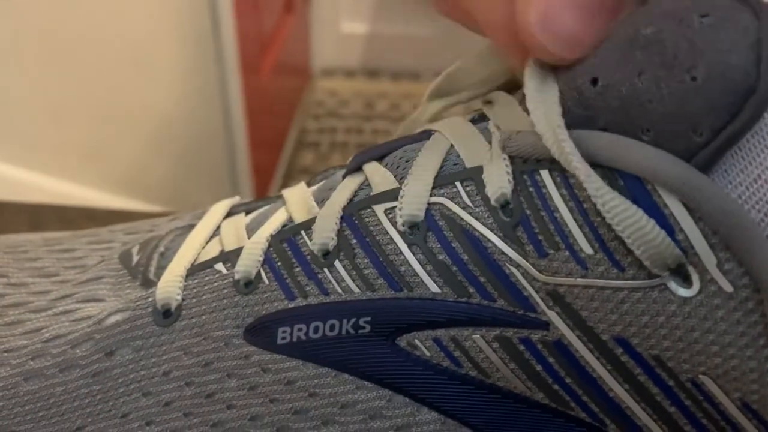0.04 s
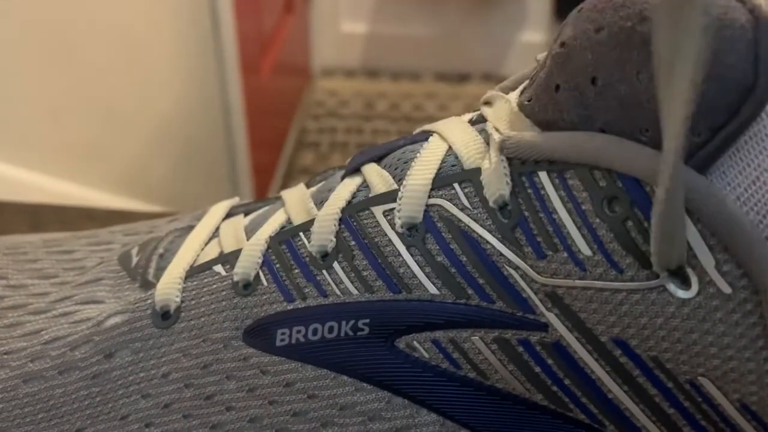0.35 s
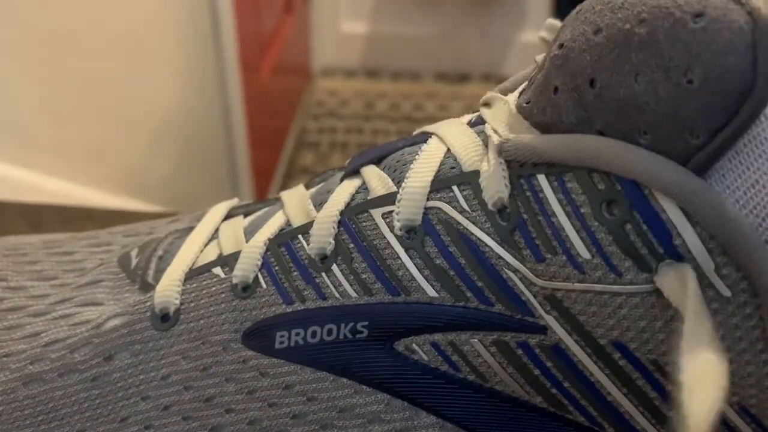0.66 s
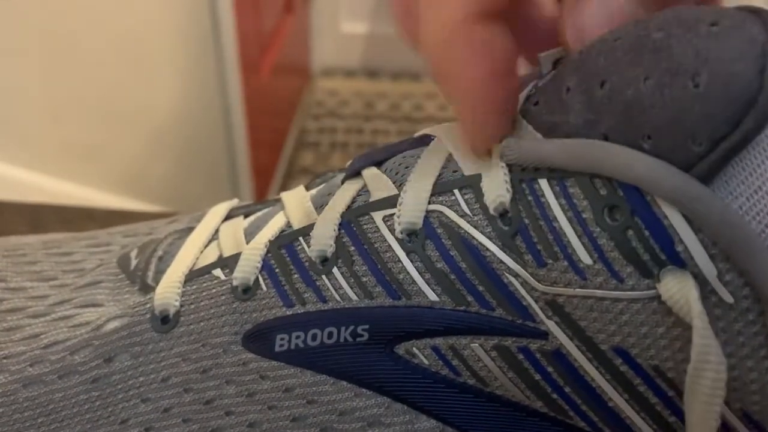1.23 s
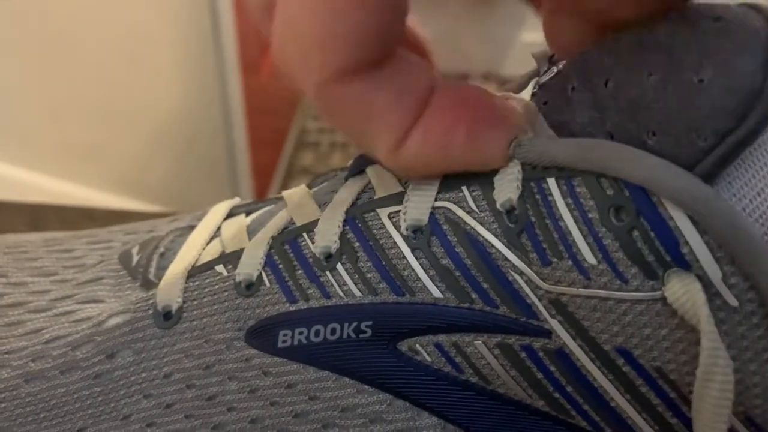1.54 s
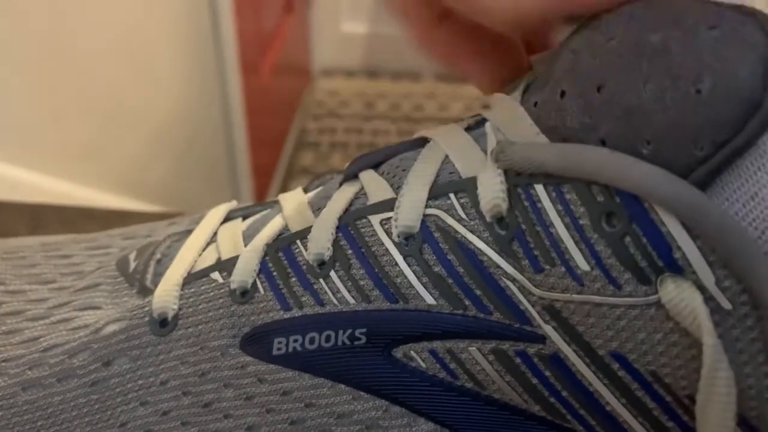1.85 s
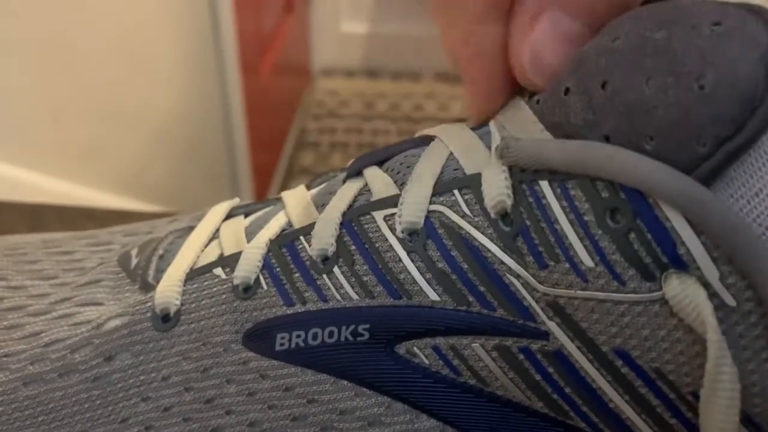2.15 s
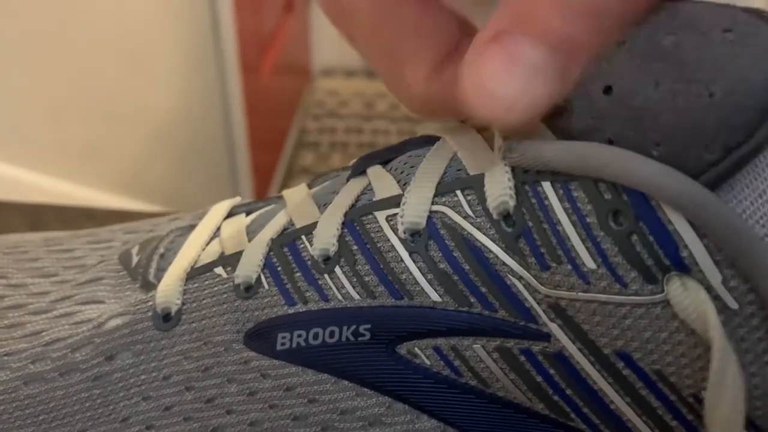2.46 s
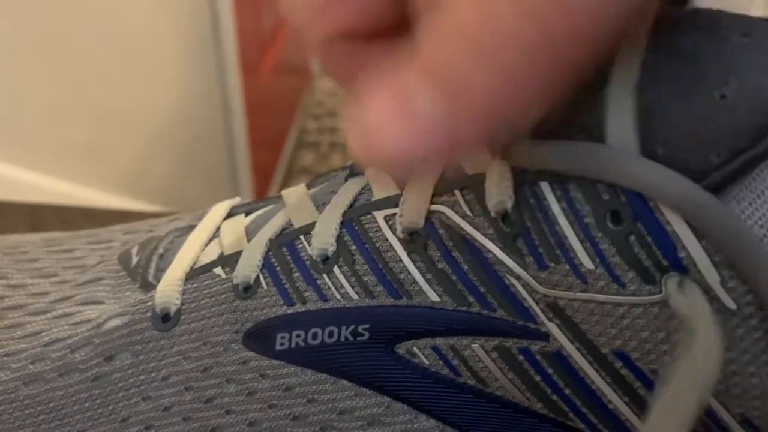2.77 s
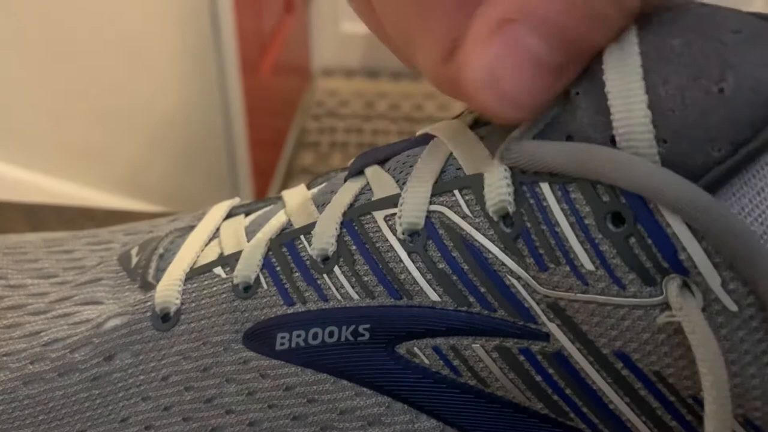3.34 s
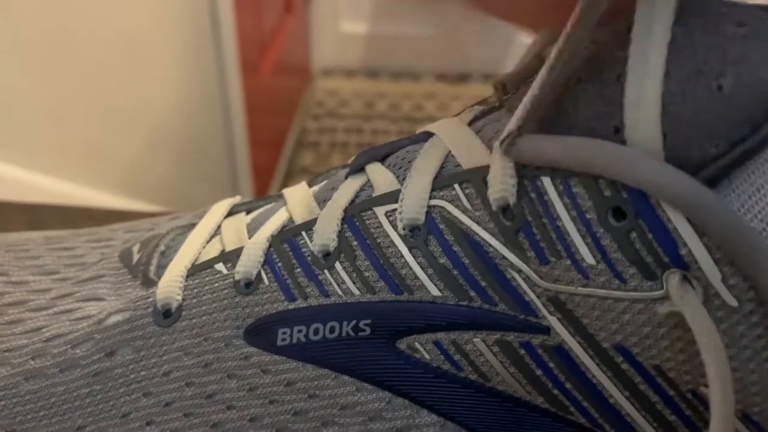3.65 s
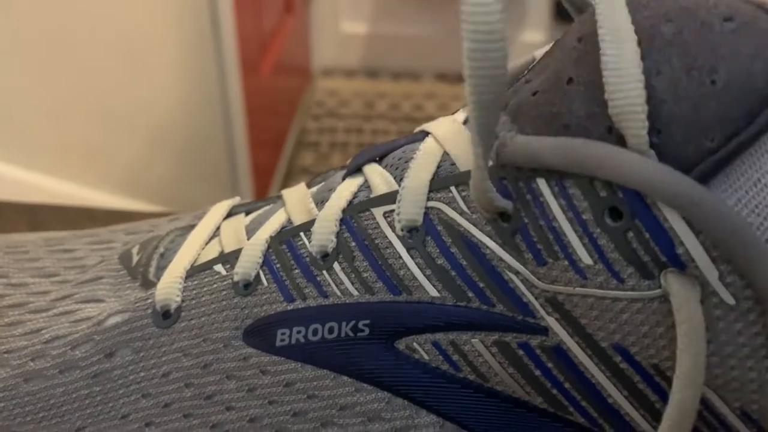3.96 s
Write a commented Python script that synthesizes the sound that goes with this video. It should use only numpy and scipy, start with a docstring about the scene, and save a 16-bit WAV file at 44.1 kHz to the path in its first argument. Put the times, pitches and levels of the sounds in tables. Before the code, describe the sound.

Shoelace being pulled loose close up, rasping in short bursts with light snaps and taps.

```python
"""A shoelace is untied close to a pair of microphones, in a quiet room with a low rumble.
Stick-slip friction makes the braid hiss and scrape as it is drawn through the knot and eyelets.
Now and then it slips or is flicked: dispersion turns the jolt into a falling chirp,
the fibres rasp, and the padded shoe thumps in its damped modes."""
import sys
import numpy as np
from scipy import signal
from scipy.fft import rfft, irfft
from scipy.io import wavfile

SR = 44100
rng = np.random.default_rng(int(sys.argv[2]) if len(sys.argv) > 2 else 0)


def wav_out(sig):
    """Save sig, one row per channel (or a flat mono array), as 16-bit PCM at SR to the path in sys.argv[1]."""
    wavfile.write(sys.argv[1], SR, np.round(np.clip(np.atleast_2d(sig).T, -1, 1) * 32767).astype(np.int16))


N = 176400
FREQS = np.arange(N // 2 + 1) * SR / N


def from_db(db):
    """Amplitude ratio: tenfold for every 20 dB."""
    return 10 ** (np.asarray(db) / 20)


def unit_rms(x):
    """Normalisation to a mean power of 1."""
    return x / np.sqrt(np.mean(x ** 2) + 1e-20)


def gains(points):
    """Frequency response through (Hz, dB) points, interpolated over log frequency."""
    hz, db = np.transpose(points)
    return from_db(np.interp(np.log(FREQS + 1e-9), np.log(hz), db))


def colour(x, points):
    """Linear filtering: the spectrum is multiplied by a frequency response."""
    return irfft(rfft(x) * gains(points), N)


def stereo(pair, side_points):
    """Mid-side mixing: two uncorrelated signals share a constant total power."""
    ratio = gains(side_points)
    weights = np.array([np.ones_like(ratio), ratio]) / np.sqrt(1 + ratio ** 2)
    mid, side = irfft(rfft(pair) * weights, N)
    return np.array([mid + side, mid - side])


def drift(rate_hz):
    """Random modulation: low-passed noise with a spread of 1."""
    count = N // 20 + 1
    rolloff = (1 + (FREQS[:count // 2 + 1] / rate_hz / 2) ** 2) ** 2
    slow = irfft(rfft(rng.standard_normal(count)) / rolloff, count)
    return np.interp(np.arange(N) / 20, np.arange(count), unit_rms(slow))


def add(out, start_s, sound):
    """Superposition: a short sound adds to what is already there."""
    i = max(0, int(start_s * SR))
    out[i:i + len(sound)] += sound[:max(0, N - i)]


# Spectrum of the rumble. Each row: frequency in Hz, relative spectral density in dB.
RUMBLE_SPECTRUM = [(22, -8), (40, -5.5), (62, 0), (82, -2), (115, 1.5), (150, -6), (200, -10), (260, -17.5),
                   (400, -22), (520, -26.5), (650, -40), (950, -49), (2500, -69), (6000, -51), (10000, -79),
                   (16000, -51)]
# Resonances in the rumble. Each row: centre in Hz, bandwidth in Hz, level in dB.
DRONE_BANDS = [(95, 12, -60.5), (288.1, 18.3, -64.5), (454, 39, -71.5)]
# Stereo width of the rumble. Each row: frequency in Hz, side minus mid in dB.
RUMBLE_WIDTH = [(60, -19.5), (130, -16), (280, -5), (600, -2.5), (2000, 0), (16000, 5)]

def room_rumble():
    """Low broadband noise, as of ventilation, drones where narrow resonances reinforce it."""
    rumble = from_db(-51) * unit_rms(colour(rng.standard_normal((2, N)), RUMBLE_SPECTRUM))
    for hz, width_hz, db in DRONE_BANDS:
        band = rfft(rng.standard_normal((2, N))) / (1 + ((FREQS - hz) / width_hz * 2) ** 2)
        rumble += from_db(db) * unit_rms(irfft(band, N))
    return stereo(rumble, RUMBLE_WIDTH)


# Spectrum of the wall reflections. Each row: frequency in Hz, relative gain in dB.
REVERB_SPECTRUM = [(100, 4), (500, 23.5), (2000, -8.5), (6000, -57), (15000, -24)]

def reverberation(x, level_db=-29, t60_s=.18):
    """Diffuse reflections from the walls form a faint, dull tail that decays exponentially."""
    t = np.arange(SR // 2) / SR
    tail = colour(rng.standard_normal((2, N)), REVERB_SPECTRUM)[:, :len(t)] * from_db(-60 * t / t60_s)
    tail /= np.sqrt(np.sum(tail ** 2) / 2)
    return from_db(level_db) * signal.fftconvolve(x, tail, axes=1)[:, :N]


def shoe_reflection(x, delay_s=0.001079, level_db=-17, wander=0.0074):
    """Comb filtering: the shoe returns an inverted echo whose delay wanders as the lace moves."""
    now = np.arange(N)
    delayed = now - SR * delay_s * (1 + wander * drift(rate_hz=2.6))
    return x - from_db(level_db) * np.array([np.interp(delayed, now, channel) for channel in x])


# Stereo width of the lace. Each row: frequency in Hz, side minus mid in dB.
LACE_WIDTH = [(100, -20.5), (400, -14.5), (1100, -1), (2000, 5.5), (3200, 8), (4200, -4.5), (5100, 6.5),
              (6200, -14.5), (7200, -0.5), (8500, 23.5), (9700, -2), (11000, -7.5), (12300, -5),
              (13300, 74), (14600, -29), (15600, -29)]

def at_microphones(pair):
    """Phase difference: the microphones hear some bands of the lace in phase, others in opposition."""
    return stereo(pair, LACE_WIDTH)


def lean_left(x, difference_db=3.5):
    """Level difference: the lower-pitched friction is nearer the left microphone, so louder there."""
    return x * from_db(difference_db / 2 * np.array([[1], [-1]]))


def chirp(t, hz, rise_s, halving_s):
    """Dispersion: a jolt runs along the lace highs first, so the pitch falls."""
    age = t / rise_s
    tail = .025 * np.exp(-age / 10)
    envelope = (age * np.exp(1 - age) + tail) * np.tanh(2 * age) ** 2
    return -envelope * np.sin(2 * np.pi * hz * halving_s * np.log1p(t / halving_s))


# Modes of the shoe. Each row: frequency in Hz, relative level in dB, time to fall 60 dB in seconds.
SHOE_MODES = [(64.3, -1, 0.21), (88.8, 10, 0.088), (188.7, 4, 0.058), (236, 5.5, 0.0416),
              (416.3, -3, 0.079)]

def shoe_thump(t, rise_s=0.0086):
    """Damped modes ring in the shoe, building slowly as the padding gives way."""
    ring = sum(from_db(db - 60 * t / t60) * np.sin(2 * np.pi * hz * t) for hz, db, t60 in SHOE_MODES)
    return ring * (1 - np.exp(-t / rise_s))


# Spectra of the mid and treble rasp. Each row: frequency in Hz, relative spectral density in dB.
MID_RASP_SPECTRUM = [(400, -19), (1200, 5.5), (2100, 6), (3200, 2), (4200, -3), (5500, -10), (9000, -18)]
TREBLE_RASP_SPECTRUM = [(2500, -2), (5500, -12), (7500, 4), (10500, 2.5), (13000, -13.5), (16000, -0.5)]

def fibre_rasp(starts_s, levels_db, spectrum, rise_s=.0008, decay_s=.0016):
    """Transient friction: fibres tear past one another in noise bursts a few milliseconds long."""
    lead_s = .01
    t = np.arange(SR // 20) / SR - lead_s
    burst = np.exp(np.minimum(t / rise_s, -t / decay_s))
    envelope = np.zeros(N)
    for start_s, db in zip(starts_s, levels_db):
        add(envelope, start_s + rise_s - lead_s, from_db(db) * burst)
    noise = colour(rng.standard_normal((2, N)), spectrum)
    return unit_rms(at_microphones(noise)) * envelope


# Slips and flicks. Each row: start in seconds, chirp level in dB, starting pitch in Hz, rise in ms,
# time to half the pitch in ms, mid rasp level in dB, treble rasp level in dB, thump level in dB.
SLIPS = [ (0.067, -42, 2500, 2.1, 20, -45.5, -47, -56), (0.0938, -41, 1520, 1.44, 10.6, -41, -44, -41),
         (0.103, -43, 955, 1, 7.9, -45.5, -53, -48), (0.643, -28, 1750, 1.1, 0.74, -68, -88, -38),
         (0.722, -54.5, 5060, 1.3, 22, -47.5, -57, -60), (0.7351, -34.5, 1890, 1.17, 10.6, -52, -56, -42),
         (0.7373, -34, 540, 1.8, 20, -42.5, -73, -38), (0.742, -33.5, 2280, 0.97, 7.8, -46, -67, -35),
         (0.745, -42.5, 970, 0.69, 8, -55, -48, -40.5), (0.7733, -55, 1770, 2.3, 4, -60, -62, -67),
         (0.797, -46, 890, 1.3, 9.8, -45, -75, -43.5), (0.857, -39, 3690, 0.93, 13, -42.5, -34, -42.5),
         (1.354, -53, 1490, 1.3, 2.4, -68, -53, -49.5),
         (1.3868, -40.5, 2470, 1.87, 1.99, -35, -46.5, -39.5),
         (1.447, -75, 2510, 0.55, 3.8, -56, -53.5, -44), (1.5955, -51, 1590, 1.5, 4, -44, -39, -45),
         (1.602, -42.5, 1630, 1.1, 6.3, -44, -46, -55), (1.632, -28, 1877, 1.83, 2.84, -31, -31.5, -71),
         (1.636, -38, 350, 1.3, 10, -30, -28.5, -28.5), (1.8138, -57, 2430, 1.6, 2.1, -61, -46, -67),
         (2.2347, -81, 2000, 0.87, 3, -70, -59, -59), (2.556, -52, 1240, 2.2, 4, -61, -43, -57),
         (2.576, -42, 845, 3.1, 6.2, -61, -37.5, -66), (2.591, -35.5, 870, 1.94, 4.8, -40, -47, -64),
         (2.6, -44, 860, 1.9, 4.8, -43, -43, -69), (2.610, -32.5, 900, 0.84, 2.9, -44.5, -44, -69),
         (2.6751, -27, 1100, 1.52, 2.5, -58, -48, -61), (2.702, -32, 1720, 0.71, 1.6, -57, -30.5, -65),
         (2.705, -28.5, 373, 2.24, 5.9, -59, -37, -48), (2.8605, -35.5, 1210, 1.7, 2.43, -52.5, -49, -43.5),
         (2.9243, -79, 2000, .8, 4.1, -68, -55.5, -85), (2.9805, -64, 2020, 1.7, 6.7, -47.5, -46, -61),
         (2.995, -70, 1610, 2.7, 11, -49, -58, -70), (3.0299, -55, 1480, 1.6, 20, -51.5, -64, -77),
         (3.135, -48.5, 1470, 1.1, 20, -58, -66, -73), (3.1891, -23, 1400, 0.96, 18, -28, -32, -48),
         (3.4363, -47, 1930, 2.1, 5.25, -54, -42, -37), (3.464, -44, 2300, 1.8, 19, -45, -50, -39.5),
         (3.473, -34, 1490, 0.61, 4.5, -59, -36, -56), (3.616, -49, 1010, 1, 3.6, -67, -68, -38.5),
         (3.7464, -56, 1500, 1, 4, -52, -57, -60), (3.807, -49, 1530, 1.6, 2.6, -41, -51, -54),
         (3.824, -60, 1500, 1.1, 2.8, -57, -45, -66), ]

def slipping_lace(left_lag_s=0.00019, chirp_left_db=3, roughness=.08):
    """Impulsive excitation: each slip or flick sets off a chirp, a thump and a rasp together."""
    t = np.arange(SR // 5) / SR
    tones = np.zeros((2, N))
    thump = shoe_thump(t)
    for start_s, chirp_db, hz, rise_ms, halving_ms, _, _, thump_db in SLIPS:
        glide = chirp(t, hz, rise_ms / 1000, halving_ms / 1000)
        for channel, share in zip(tones, (.5, -.5)):
            jolt = from_db(chirp_db + share * chirp_left_db) * glide + from_db(thump_db) * thump
            add(channel, start_s + share * left_lag_s, jolt)
    starts_s, *_, mid_db, treble_db, _ = np.transpose(SLIPS)
    mid = lean_left(fibre_rasp(starts_s, mid_db, MID_RASP_SPECTRUM))
    treble = fibre_rasp(starts_s, treble_db, TREBLE_RASP_SPECTRUM)
    flicker = 1 + roughness * np.array([drift(rate_hz=730), drift(rate_hz=790)])
    return tones * flicker + mid + treble


def friction(level_db, spectrum, clicks_per_s, flutter_db):
    """Stick-slip: fibres catch and let go in tiny clicks of uneven size while the grip flutters."""
    clicks = (rng.random(N) < clicks_per_s / SR) * rng.standard_normal((2, N))
    return unit_rms(colour(clicks, spectrum)) * from_db(level_db + flutter_db * drift(rate_hz=12.3))


def shifting_bands(x, depth_db=3, rate_hz=8.1):
    """Amplitude modulation: as the lace shifts, each half octave swells and fades on its own."""
    half_octaves = 2 * np.log2(FREQS.clip(375, 6000) / 375)
    spectrum = rfft(x)
    windows = (np.maximum(0, 1 - abs(half_octaves - k)) for k in range(int(half_octaves.max()) + 1))
    return sum(irfft(spectrum * window, N) * from_db(depth_db * drift(rate_hz)) for window in windows)


# Spectrum of the scrape. Each row: frequency in Hz, relative spectral density in dB.
SCRAPE_SPECTRUM = [(60, 17), (180, 21.5), (450, 10.5), (800, 4), (1400, 7), (2200, 6), (3100, 9), (4200, 0),
                   (5300, -3), (8000, -56)]

def braid_scrape(level_db, flutter_db=2.44):
    """Coarse stick-slip of the braid, with sparser clicks from single threads that snag."""
    scrape = friction(level_db - .5, SCRAPE_SPECTRUM, clicks_per_s=5000, flutter_db=flutter_db)
    snags = friction(level_db - 12.5, MID_RASP_SPECTRUM, clicks_per_s=1700, flutter_db=flutter_db)
    return lean_left(at_microphones(shifting_bands(scrape + snags)))


# Spectrum of the hiss. Each row: frequency in Hz, relative spectral density in dB.
HISS_SPECTRUM = [(1800, -6.5), (3100, -10), (5400, -9.5), (6500, 1.5), (9000, 5), (11000, 6.5), (11700, -6),
                 (12500, 2.5), (15800, -3)]

def fibre_hiss(level_db, shelf_db, shelf_hz=12000):
    """Fine stick-slip of the fibres, modulated as the weave bumps unevenly over an edge."""
    bumps_db = 0.88 * drift(rate_hz=80)
    hiss = friction(level_db - 2.5 + bumps_db, HISS_SPECTRUM, clicks_per_s=6500, flutter_db=2.1)
    top = signal.sosfiltfilt(signal.butter(2, shelf_hz, "high", fs=SR, output="sos"), hiss)
    return at_microphones(hiss + (from_db(shelf_db) - 1) * top)


# Friction envelopes, one list per pull.
# Each row: time in seconds, relative hiss level in dB, relative scrape level in dB.
PULL_ENVELOPES = [
    [(0, -71, -67.5), (0.05, -58.5, -59), (0.1, -56.5, -51.5), (0.165, -47.5, -56.5), (0.27, -56, -99),
     (0.33, -64, -90), (0.46, -63.5, -66), (0.54, -83.5, -77)],
    [(0.72, -78.5, -75), (0.748, -70, -54), (0.78, -84, -66), (0.85, -70.5, -69), (0.905, -56.5, -63.5),
     (0.97, -67.5, -64), (1.015, -62, -65.5), (1.05, -54, -57.5), (1.1, -70, -68)],
    [(1.145, -76, -64.5), (1.18, -61.5, -66.5), (1.275, -63, -63), (1.32, -82, -81.5), (1.39, -66, -64),
     (1.47, -77, -71), (1.56, -74.5, -74.5)],
    [(1.58, -66, -63.5), (1.62, -55, -51.5), (1.655, -49, -52.5), (1.77, -56, -56.5), (1.798, -68, -67.5),
     (1.83, -64, -65.5), (1.92, -78, -70), (2.0, -68, -64), (2.06, -80, -73)],
    [(2.13, -74, -74.5), (2.19, -62.5, -59.5), (2.25, -74, -66), (2.36, -80, -77.5)],
    [(2.39, -70.5, -67.5), (2.44, -50.5, -57.5), (2.495, -44, -52), (2.545, -58, -63.5), (2.6, -51.5, -51),
     (2.67, -54, -51), (2.715, -43.5, -45), (2.805, -44.5, -54.5), (2.86, -54.5, -56), (2.905, -72, -72)],
    [(2.96, -71, -75), (2.99, -63, -58.5), (3.06, -62.5, -66.5), (3.125, -64, -67), (3.165, -50.5, -64),
     (3.2, -42, -49.5), (3.29, -53, -61.5), (3.345, -56, -66), (3.41, -54.5, -60)],
    [(3.43, -52, -53), (3.478, -41, -49), (3.53, -53, -52), (3.605, -67.5, -63), (3.645, -48.5, -59.5),
     (3.7, -62.5, -58), (3.77, -49.5, -63.5), (3.822, -47, -49.5), (3.855, -79.5, -72)],
]
# Brightness of the pulls. Each entry: gain of one pull's highest hiss in dB.
PULL_SHELF_DB = [3.5, -3, 0, 2, -3.5, -6, -1, 5]

def sliding_lace():
    """Sliding friction: hiss and scrape follow each pull of the braid over itself and the eyelets."""
    points = [(*row, db) for pull, db in zip(PULL_ENVELOPES, PULL_SHELF_DB) for row in pull]
    times_s, *levels_db = np.transpose(points)
    times_s = np.maximum.accumulate(times_s)
    hiss_db, scrape_db, shelf_db = (np.interp(np.arange(N) / SR, times_s, db) for db in levels_db)
    return shoe_reflection(fibre_hiss(hiss_db, shelf_db) + braid_scrape(scrape_db))


def scene():
    """Superposition of the lace, its reverberation and the rumble."""
    lace = sliding_lace() + slipping_lace()
    return lace + reverberation(lace) + room_rumble()


def record(dry, low_cut_hz=61.6, high_cut_hz=16000):
    """Band limiting: the deepest bass is rolled off and the top is cut steeply."""
    thin = signal.sosfilt(signal.butter(2, low_cut_hz, "high", fs=SR, output="sos"), dry)
    return signal.sosfiltfilt(signal.ellip(10, .05, 60, high_cut_hz, fs=SR, output="sos"), thin)


dry = scene()
out = record(dry)
wav_out(out)
```